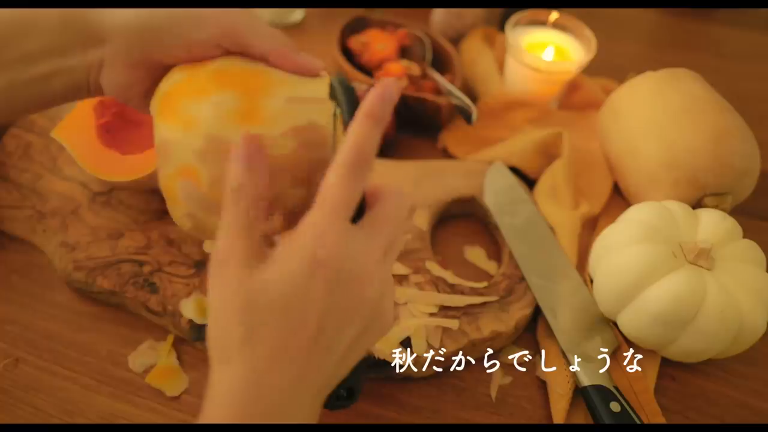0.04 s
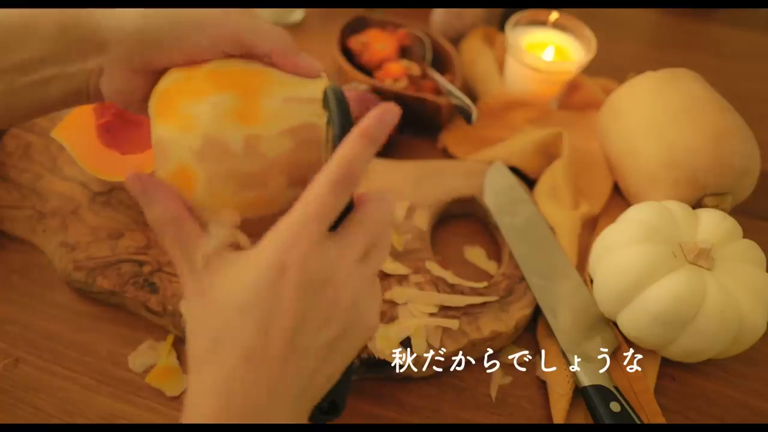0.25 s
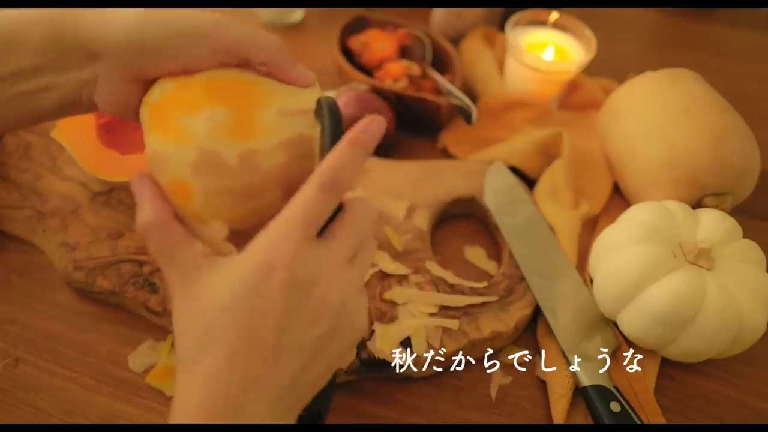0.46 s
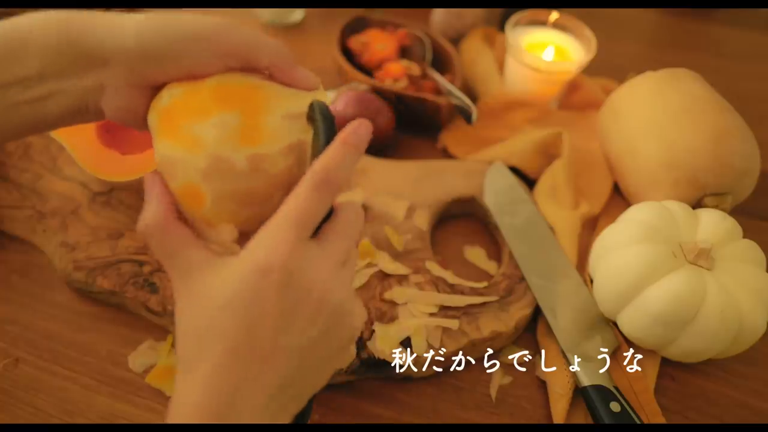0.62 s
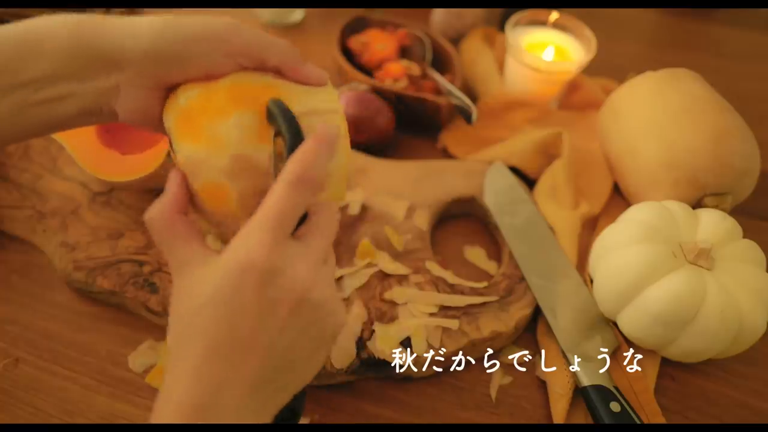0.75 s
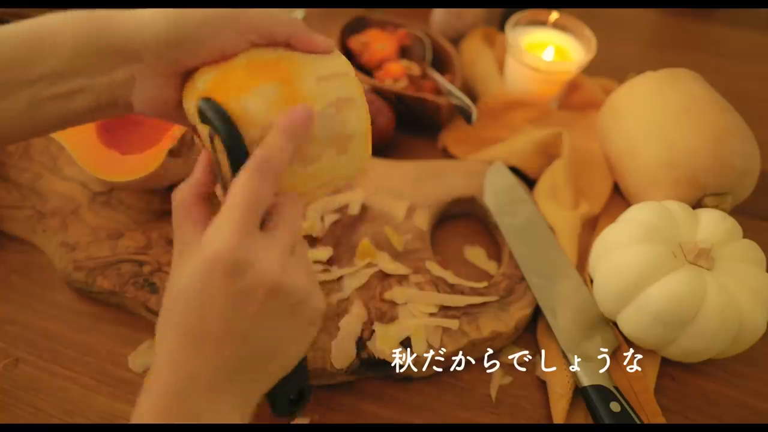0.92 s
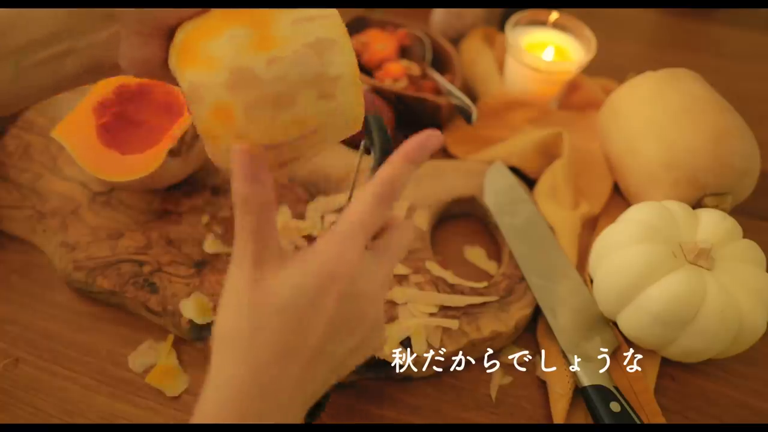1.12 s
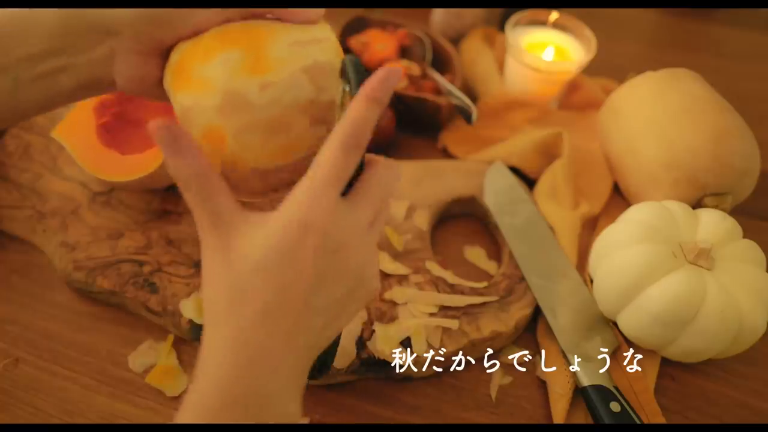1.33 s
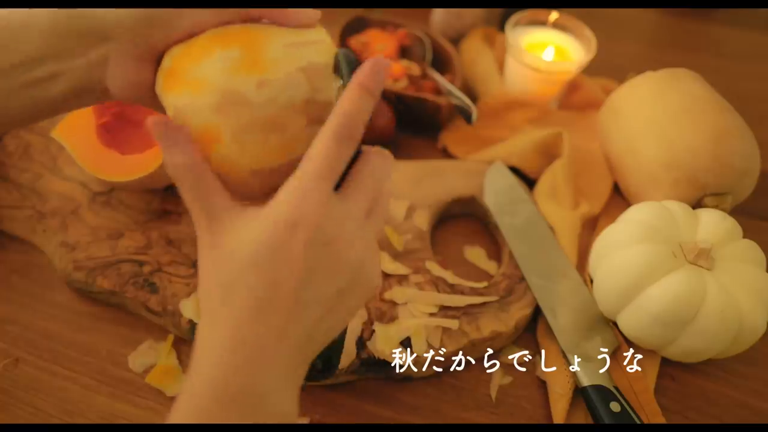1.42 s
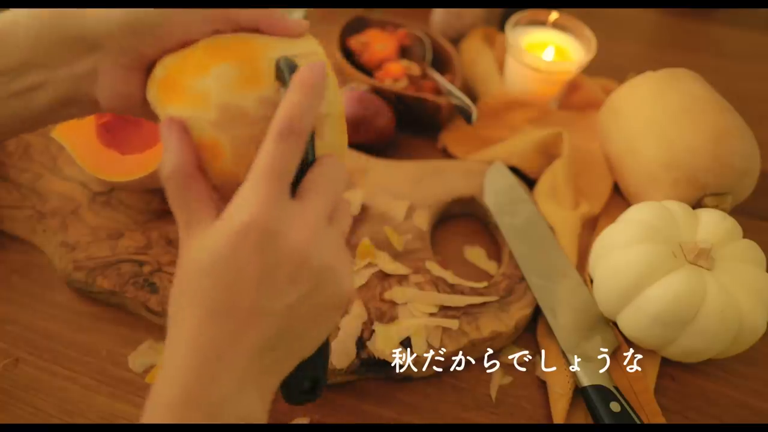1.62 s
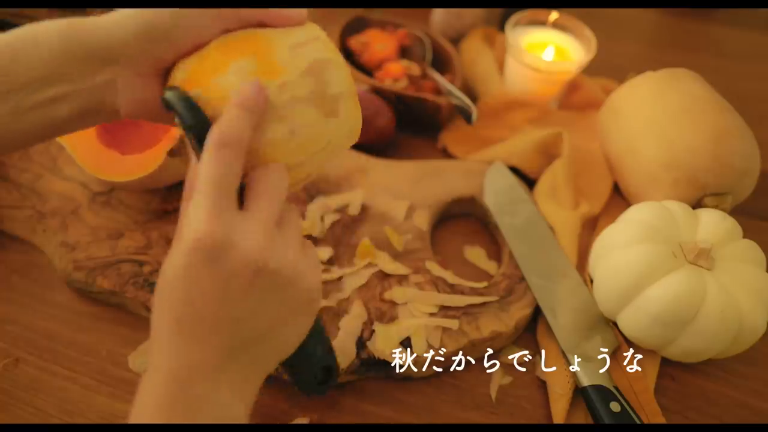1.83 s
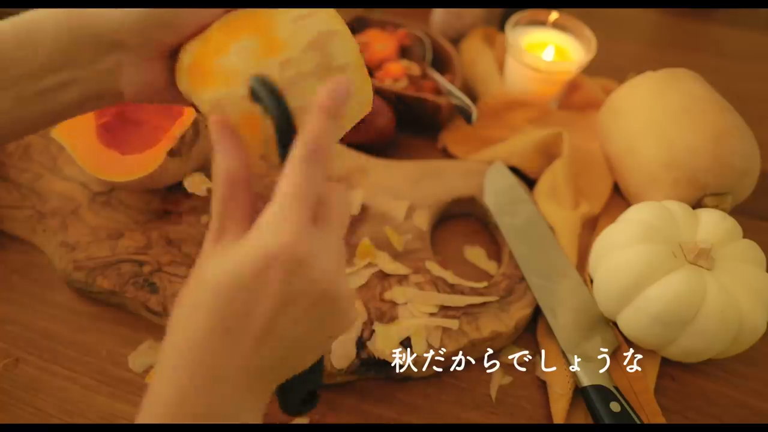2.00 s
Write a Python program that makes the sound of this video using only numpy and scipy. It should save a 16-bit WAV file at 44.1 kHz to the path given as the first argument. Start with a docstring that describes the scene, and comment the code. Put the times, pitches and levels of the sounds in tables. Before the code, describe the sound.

A vegetable peeler scrapes a hard squash, close and slightly left, in a quiet kitchen with faint room noise and a short tail. After tiny ticks, the first stroke begins near 0.5 s, bites with a loud, nasal chatter around 0.7, and fades by 1.1. Blade clicks and a dull wooden knock come near 1.2. A second, lighter stroke starts at 1.5, rasping crisply around 1.85 and fading by 2.

```python
"""A swivel peeler is pulled twice across a hard squash, close by, in stereo, in a quiet kitchen.
The blade sticks and slips: each slip is a chattering sine plus tiny tears that ring the peeler's modes.
A softer drag of tears runs through each pull. The blade is reset with ticks of ringing noise.
The squash knocks on the board: ringing noise and a low sine thud. The room adds a short tail and faint noise."""
import sys
import numpy as np
from scipy import signal
from scipy.fft import rfft, irfft
from scipy.io import wavfile
from scipy.ndimage import uniform_filter1d

SR = 44100
rng = np.random.default_rng(int(sys.argv[2]) if len(sys.argv) > 2 else 0)


def volts(x):
    """Linear amplitude factor 10**(x/20) for a level x in dB, scalar or array-like."""
    e = np.asarray(x, float) / 20
    return 10 ** e


def put_to_file(sound):
    """Save the sound as 16-bit audio at rate SR, in the file named by the first command-line argument."""
    columns = np.atleast_2d(sound).T  # one column per channel
    safe = np.clip(columns, -1, 1)
    whole_steps = np.round(safe * 32767)
    wavfile.write(sys.argv[1], SR, whole_steps.astype(np.int16))


N = 91154

# room tone: spectrum (frequency [Hz], relative density [dB])
TONE_SPECTRUM = [(15, -59), (25, -14), (43, -33.5), (128, -7), (238, -2), (358, -3), (483, -19.5),
                 (634, -9), (1360, -13.5), (1730, -15), (1880, -15), (2530, -17), (3810, -20),
                 (4240, -20.5), (11600, -22.5), (15200, -28), (16500, -41)]
# room tone: left-right correlation (frequency [Hz], correlation [-1..1])
TONE_CORRELATION = [(60, 0.96), (130, 0.58), (290, 0.58), (640, -0.57), (1410, -0.74), (3100, -0.032),
                    (6820, 0.42), (15000, 0.65)]
# room tone: left minus right (frequency [Hz], level [dB])
TONE_PAN = [(30, 2.2), (150, 9.3), (300, 8.4), (700, 8.6), (1500, 1.4), (4000, 0.9), (15000, 0.86)]
# room tone: gain above the split frequency (time [s], gain [dB])
TONE_TREBLE = [(0, 4), (.06, 0), (.3, -0.5), (.5, -1), (1.15, 0.5), (1.3, 1), (1.5, -2), (2.07, 4)]
TONE_DB, TONE_SPLIT_HZ = -60, 1200
TONE_LOW_WANDER_DB, TONE_LOW_WANDER_PER_S = 1, 9.5
TAIL_DB, TAIL_T60_S, TAIL_TOP_HZ, TAIL_SHARED_GAIN, TAIL_DELAY_S = -14, 0.34, 6600, 0.15, 0.002

# modes of squash and board (frequency [Hz], width per filter pass [Hz], level [dB])
BOARD_MODES = [(305, 50, 8.5), (246, 47, 3), (352, 43, -0.5), (810, 440, -12), (1990, 1430, -17)]
KNOCK_S, KNOCK_DB, KNOCK_PUSH_S, KNOCK_ROLL_DB, KNOCK_ROLL_S = 1.254, -52.5, 0.023, -5.5, 0.21
THUD_DB = 1  # re knock

# ticks of the blade on its pivot
# (time [s], level [dB], frequency [Hz], width per filter pass [Hz], decay [s])
TICKS = [(0.072, -58, 1600, 170, 0.014), (0.078, -60, 8800, 2000, 0.003), (0.207, -62, 12000, 5000, 0.012),
         (1.199, -47, 11000, 8100, 0.003), (1.201, -55, 2200, 2300, .002), (1.206, -54, 9800, 4500, 0.008),
         (1.243, -57, 7700, 9000, 0.006), (1.256, -57, 1900, 1500, 0.004), (1.403, -51, 950, 800, 0.003),
         (1.654, -54, 2200, 2000, 0.002)]
TICK_CONTACT_DB = -9

# slips of the blade (start [s], length [s], chatter level [dB], chatter frequency [Hz],
# upper ring [dB re chatter], hiss [dB re chatter], high hiss [dB re chatter])
SLIPS = [(0.541, 0.012, -48.5, 1542, -1.5, 1, -5.5), (0.593, 0.0051, -51.5, 1580, -1, -6, -17),
         (0.625, 0.0094, -33, 1610, -12.5, -5, -7), (.667, 0.013, -26, 1590, -11, -9.5, -10.5),
         (0.716, 0.008, -39, 2380, -7, 1, -6), (0.716, 0.018, -27.5, 1591, -7.5, -8, -13.5),
         (0.729, 0.015, -30.5, 1620, -1, -3, -5.5), (0.745, 0.0085, -37, 2490, -8, -6, -16),
         (0.749, 0.018, -43, 1670, -7, -9, -14), (0.791, 0.016, -46, 1614, 0, -10, -14),
         (0.849, 0.012, -51, 1580, -12, 2.5, -2), (0.858, 0.017, -47.5, 1660, -13, -4.5, -4.5),
         (0.884, 0.02, -49.5, 1630, 1, -3.5, 0.5), (0.9, 0.018, -47.5, 1900, 6.5, -1, -1),
         (0.925, 0.02, -47.5, 1970, -1.5, -5, -8), (0.956, 0.038, -61, 1598, -4, -13, -13),
         (1.06, 0.027, -68, 1640, -4, -6, -8), (1.522, .013, -47.5, 1539, -16, -16.5, -18),
         (1.536, 0.008, -48.5, 1540, -6, -17, -21), (1.57, 0.016, -58, 1520, -2, -9, -6.5),
         (1.583, 0.014, -52.5, 1560, -4, -9, -9), (1.61, 0.021, -53.5, 1550, -8.5, -13, -9),
         (1.649, 0.015, -52, 1540, -6.5, -9.5, -10), (1.676, 0.019, -56, 1560, -10, -4.5, -18),
         (1.708, 0.018, -49, 1617, -3.5, 0, -7), (1.745, 0.0075, -53, 1560, 5.5, 12, 5),
         (1.749, 0.012, -50.5, 1575, -2, 1, -3), (1.792, 0.0085, -39, 1620, 4, 2.5, 3.5),
         (1.799, 0.016, -39, 1615, -2, -1, 1), (1.814, 0.017, -40.5, 1630, -10, -5, -1.5),
         (1.851, 0.016, -35, 1725, 0.5, -8, -1.5), (1.859, 0.024, -44, 1960, 8.5, -1.5, 4),
         (1.877, 0.015, -43, 1640, -2, -8, -7), (1.889, 0.029, -50.5, 2855, -1, -10, -10),
         (1.935, 0.013, -60, 2720, -4, -8, -10), (1.943, 0.021, -58.5, 2006, -3, -4, -10),
         (1.97, 0.02, -62, 2520, -4, -10, -10), (2.008, 0.025, -65, 2000, -9, -11, -13)]
SLIP_RISE_S, SLIP_FALL_S = 0.0033, 0.0043
CHATTER_WANDER_FRACTION, CHATTER_WANDER_PER_S = 0.00642, 300
CHATTER_FLUTTER_DB, CHATTER_FLUTTER_PER_S = 2, 110
LOW_RING_DB = -6.5  # re chatter

# steady drag, one list per pull (time [s], low ring [dB], upper ring [dB re low ring],
# hiss [dB re low ring], high hiss [dB re low ring])
DRAGS = [
    [(.5, -78, 0, 3, 1), (.57, -66.5, -12, -3.5, -6), (.65, -64.5, 0, -1, 1), (.7, -54.5, -8, -6, -5),
     (.76, -48, 5, -2, -1), (.83, -52.5, -1.5, -5.5, -8.5), (.88, -50.5, -1, -5.5, -4),
     (.955, -54, -2.5, -4, -7), (1.0, -60.5, 2.5, -5.5, -3.5), (1.04, -66.5, 2.5, -7, -3),
     (1.09, -70, 1.5, -9, -12), (1.16, -79, -11, -17, -4)],
    [(1.49, -72, -17, -7, -6), (1.55, -62, -6, -5, -2.5), (1.64, -59.5, -12, -8, -15),
     (1.7, -65, -4, -6, -15), (1.775, -71.5, 6, 7, 1), (1.842, -55, -6, 1, 0), (1.9, -58.5, 7, 1.5, 2),
     (1.95, -66.5, 14, 5.5, 2), (2.0, -70, 11.5, 2, -4), (2.066, -73, 11, 1, -5)],
]
SNAG_DB, SNAGS_PER_S = 2, 51

# peeler modes: (frequency [Hz], width [Hz], then level [dB] in each of seven grips:
# first catches, bite, rasp, run-out; light approach, deep cut, run-out)
# widths: per filter pass in the low and upper ring, at half amplitude in the edge and top ring
LOW_RING_MODES = [(1550, 80, -6.5, -4, -2.5, -14, 3.5, 1, -1), (1609.6, 96, 1, 3.5, 2, 4.5, 1, 5, 0),
                  (1707, 107, -2.5, 4.5, 2, -3, 2, 8, -1.5),
                  (1075, 240, -29, -23, -12.5, -15.5, -26, -2, -8.5),
                  (735, 300, -25.5, -27.5, -21.5, -25, -20, -20, -22)]
UPPER_RING_MODES = [(1970, 140, 3, -5, 5, 3, 5, 1.5, 2), (2268, 153, -2, 4, -2, -5, -8, -8, -2),
                    (2415, 124, -3, -2, -6, -8, -17, -1, 1.5), (2518, 230, -4, 4, -3, -3, -9, -1, -1),
                    (2840, 130, -10, -5, -6, -2.5, -9, 3.5, -1),
                    (2992, 190, -20, -10.5, -11, -8, -11, 0, -10),
                    (2490, 1350, -7.5, -11.5, -3, -16, -2.5, -14, -18),
                    (3960, 470, -18, -12, -10, -7.5, -17, -13.5, -8.5)]
EDGE_RING_MODES = [(4220, 600, -0.54, -0.52, -1, 0, -8, -3, 2),
                   (5530, 1250, -2.2, 0.12, 1.5, -2.2, -1, -6, 5.5),
                   (6490, 830, 2.4, 1, -2, 0.82, 11, 7, -1), (7540, 790, 0.42, 0.053, 4, 0.2, 11, 1.5, 0)]
TOP_RING_MODES = [(8930, 990, 2, 2, 6, 4.5, 6, 3.5, 0), (9910, 750, -5, 3, -1, 1, 1, -5, 3),
                  (10490, 920, -1, 8, 0, -1, -6, -8, 10), (12140, 1550, -2, 3, 2, 1, 3, 0, -1.5),
                  (14500, 950, 4, 5, 0, -1, 3, -6, -6)]
# changes of grip (time [s])
REGRIPS = [.71, .76, .95, 1.3, 1.785, 1.89]
PATCHY_DB, PATCHES_PER_S = 2.5, 48

# broad hiss of tearing skin (frequency [Hz], relative density [dB])
TEAR_SPECTRUM = [(300, -5), (1000, 5), (3200, -53), (3800, -2), (5000, 2.5), (9000, -45), (12000, -21),
                 (15500, -25)]
TEAR_HISS_DB, TEARS_PER_S, TEAR_SCATTER_DB = -20.5, 7900, 2.5

# near sounds: left minus right (frequency [Hz], level [dB])
NEAR_PAN = [(500, 0.5), (1500, 3.5), (3000, 3), (8000, 2.5), (15000, 2.5)]
NEAR_LOW_CUT_HZ = 146


def read(table, hz):
    """Interpolates a (frequency [Hz], value) table on a log-frequency axis."""
    points = np.array(table, float)
    return np.interp(np.log(hz + 1), np.log(points[:, 0] + 1), points[:, 1])


def unit(x):
    """Scales to rms 1."""
    return x / np.sqrt(np.mean(x ** 2))


def colour(x, table):
    """Filters by a (frequency [Hz], gain [dB]) table."""
    return irfft(rfft(x) * volts(read(table, np.fft.rfftfreq(N, 1 / SR))), N)


def walk(rate_per_s):
    """Slow random wander, spread 1: noise averaged twice over 1 / rate."""
    span = int(SR / rate_per_s)
    return unit(uniform_filter1d(uniform_filter1d(rng.standard_normal(N), span), span))


def ring(x, modes):
    """Sum of two-pole resonances, each applied twice; white input of rms 1 gives rms 1."""
    out = 0
    pair = np.array([x, np.arange(N) == 0])  # signal, impulse for the normalisation
    for hz, width_hz, db in modes:
        radius = np.exp(-np.pi * max(width_hz, 5) / SR)
        a = [1, -2 * radius * np.cos(2 * np.pi * hz / SR), radius * radius]
        once = signal.lfilter([1, 0, -1], a, pair)
        twice = signal.lfilter([1, 0, -1], a, once)
        out = out + volts(db) * (1 - radius) ** 2 * twice
    return out[0] / np.sqrt(np.sum(out[1] ** 2))


def cluster(x, modes):
    """Crowded high modes, each waxing and waning at random; white input of rms 1 gives rms near 1."""
    f_hz, spectrum = np.fft.rfftfreq(N, 1 / SR), rfft(x)
    shapes = [volts(db) / (1 + (2 * (f_hz - hz) / width_hz) ** 2) for hz, width_hz, db in modes]
    out = sum(volts(PATCHY_DB * walk(PATCHES_PER_S)) * irfft(spectrum * s, N) for s in shapes)
    return out / np.sqrt(np.mean(sum(shapes) ** 2))


def room_tone(t):
    """Partly shared noise, louder on the left; its lows wander and its treble follows a table."""
    hz = np.fft.rfftfreq(N, 1 / SR)
    a, b = rfft(rng.standard_normal((2, N)))
    corr = np.clip(read(TONE_CORRELATION, hz), -.95, .95)
    side = volts(read(TONE_PAN, hz) / 2)
    pair = np.array([a * side, (corr * a + np.sqrt(1 - corr * corr) * b) / side])
    pair = pair * volts(read(TONE_SPECTRUM, hz)) / np.sqrt(side ** 2 + side ** -2 + 2 * corr)
    low = irfft(pair * (hz < TONE_SPLIT_HZ), N)
    high = irfft(pair * (hz >= TONE_SPLIT_HZ), N)
    low = low * volts(TONE_LOW_WANDER_DB * walk(TONE_LOW_WANDER_PER_S))
    both = low + high * volts(np.interp(t, *np.array(TONE_TREBLE).T))
    return volts(TONE_DB) * both / np.sqrt(np.mean(both.mean(axis=0) ** 2))


def room_tail(near, t):
    """Reverberation: convolution with decaying, low-passed noise, mostly separate left and right."""
    lag_s = t[:SR // 2]
    noise = rng.standard_normal((3, len(lag_s)))
    tail = TAIL_SHARED_GAIN * noise[0] + noise[1:]
    tail = tail * 10 ** (-3 * lag_s / TAIL_T60_S) * (lag_s > TAIL_DELAY_S)
    tail = signal.lfilter([1], [1, -np.exp(-2 * np.pi * TAIL_TOP_HZ / SR)], tail)
    tail = tail / np.sqrt(np.sum(tail ** 2, axis=1, keepdims=True))
    return volts(TAIL_DB) * signal.fftconvolve(near[None], tail, axes=1)[:, :N]


def knock(t):
    """The squash bumps on the board and rocks on: noise through the board modes plus a sine thud."""
    late_s = np.clip(t - KNOCK_S, 0, 1)
    bump = np.exp(-(late_s / KNOCK_PUSH_S) ** 2)
    push = (t >= KNOCK_S) * (bump + volts(KNOCK_ROLL_DB) * np.exp(-late_s / KNOCK_ROLL_S))
    thud = np.sqrt(2) * bump * np.sin(2 * np.pi * BOARD_MODES[0][0] * late_s)
    rumble = ring(push * rng.standard_normal(N), BOARD_MODES)
    return volts(KNOCK_DB) * (rumble + volts(THUD_DB) * thud)


def ticks(t):
    """Blade on pivot: an impulse of contact and a decaying noise tail, through one resonance per tick."""
    out, noise = 0, rng.standard_normal(N)
    for start_s, db, hz, width_hz, decay_s in TICKS:
        contact = np.sqrt(decay_s * SR / 2) * (np.arange(N) == int(start_s * SR))
        tail = noise * (t >= start_s) * np.exp(-np.clip(t - start_s, 0, 1) / decay_s)
        out = out + volts(db) * ring(volts(TICK_CONTACT_DB) * contact + tail, [(hz, width_hz, 0)])
    return out


def tears():
    """Dense tiny clicks of random sign and uneven size, rms 1."""
    hit, sign, size = rng.random((3, N))
    clicks = (hit < TEARS_PER_S / SR) * np.sign(sign - .5)
    return unit(clicks * volts(-TEAR_SCATTER_DB * np.log(size + 1e-6)))


def gripped(x, modes, t, resonator=ring):
    """The peeler's modes, weighted by how blade and peel are gripped at the time."""
    m, grip = np.array(modes, float), np.searchsorted(REGRIPS, t)
    return sum(resonator(x * (grip == k), m[:, [0, 1, 2 + k]]) for k in range(len(REGRIPS) + 1))


def slips(t):
    """Stick-slip: each slip is a sine chatter, mostly near 1.6 kHz; also returns power for the tears."""
    power, chatter = np.zeros((4, N)), 0
    warped_s = np.cumsum(1 + CHATTER_WANDER_FRACTION * walk(CHATTER_WANDER_PER_S)) / SR
    for start_s, length_s, db, hz, upper_db, hiss_db, top_db in SLIPS:
        late_s = t - start_s
        rise = 1 / (1 + np.exp(-np.clip((late_s - SLIP_RISE_S) / (SLIP_RISE_S / 2), -50, 50)))
        fall = np.exp(-np.clip(late_s - length_s + SLIP_FALL_S, 0, 1) / SLIP_FALL_S)
        shape = volts(db) * rise * fall
        power += (volts([[LOW_RING_DB], [upper_db], [hiss_db], [top_db]]) * shape) ** 2
        chatter = chatter + np.sqrt(2) * shape * np.sin(2 * np.pi * hz * warped_s)
    return chatter * volts(CHATTER_FLUTTER_DB * walk(CHATTER_FLUTTER_PER_S)), power


def drag_power(t):
    """Softer drag through each pull: four band powers on a table, with shared random snags."""
    power = np.zeros((4, N))
    for drag in DRAGS:
        time_s, low, upper, hiss, top = np.array(drag).T
        db = np.interp(t, time_s, low, left=-120, right=-120)
        db = db + SNAG_DB * walk(SNAGS_PER_S)
        power += volts([db] + [db + np.interp(t, time_s, band) for band in (upper, hiss, top)]) ** 2
    return power


def peeler(t):
    """Slips chatter; the tears of slips and drag ring all the modes and hiss broadly."""
    chatter, slip_power = slips(t)
    low, upper, hiss, top = np.sqrt(slip_power + drag_power(t))
    grit = tears()
    hiss_rms = np.sqrt(np.mean(colour(grit, TEAR_SPECTRUM) ** 2))
    out = chatter + gripped(low * grit, LOW_RING_MODES, t)
    out = out + gripped(upper * tears(), UPPER_RING_MODES, t)
    out = out + gripped(hiss * grit, EDGE_RING_MODES, t, cluster)
    out = out + gripped(top * grit, TOP_RING_MODES, t, cluster)
    return out + volts(TEAR_HISS_DB) * colour(hiss * grit, TEAR_SPECTRUM) / hiss_rms


def scene():
    """Near sounds, low-cut and panned, with the kitchen's tail and tone."""
    t = np.arange(N) / SR
    low_cut = signal.butter(2, NEAR_LOW_CUT_HZ, 'high', fs=SR)
    near = signal.lfilter(*low_cut, peeler(t) + ticks(t) + knock(t))
    pan = np.array(NEAR_PAN)
    direct = np.array([colour(near, pan * [1, .5]), colour(near, pan * [1, -.5])])
    return direct + room_tail(near, t) + room_tone(t)


def roll_off(x):
    """The treble ends steeply here."""
    return signal.sosfilt(signal.butter(12, 16810, fs=SR, output="sos"), x)


def record(dry):
    """Takes the finished mix to the output."""
    return roll_off(dry)


dry = scene()
out = record(dry)
put_to_file(out)
```